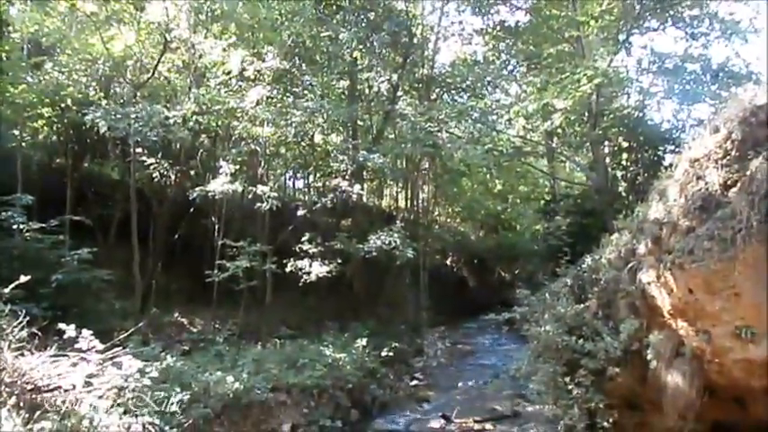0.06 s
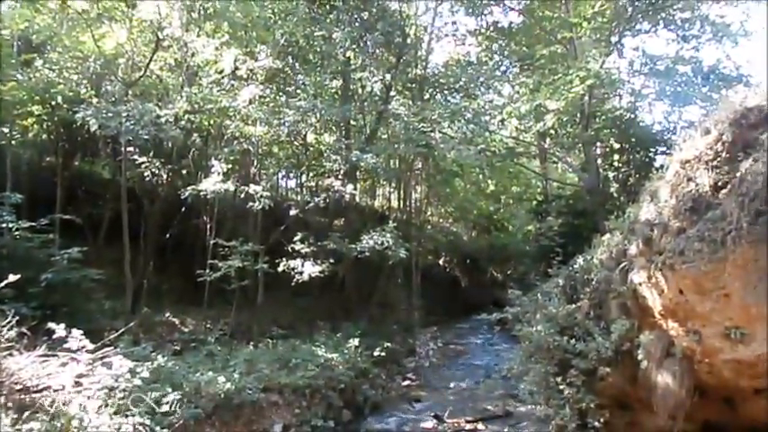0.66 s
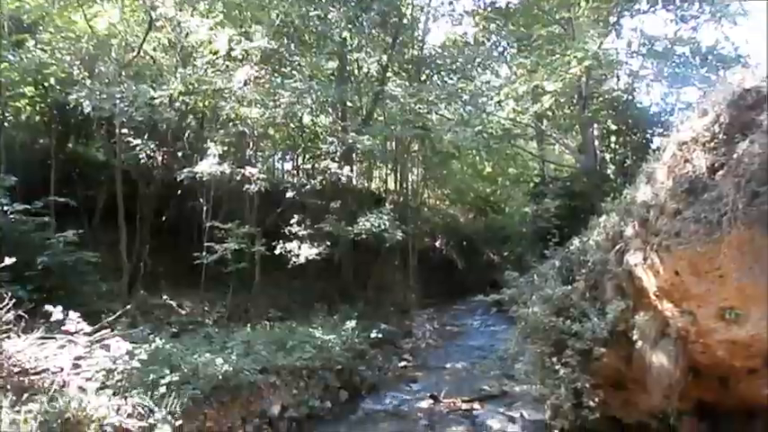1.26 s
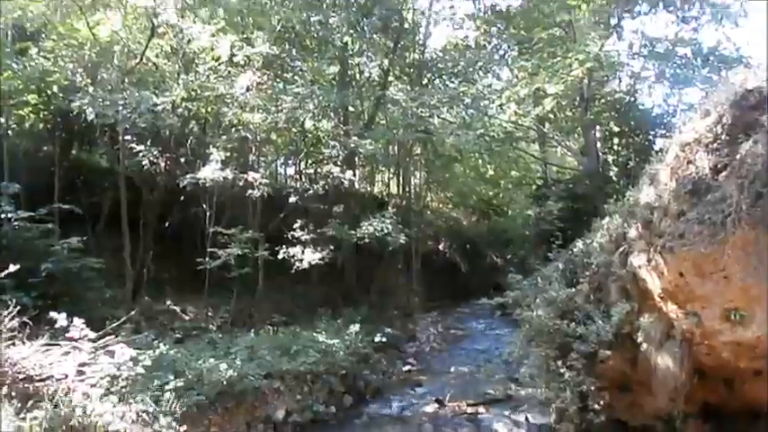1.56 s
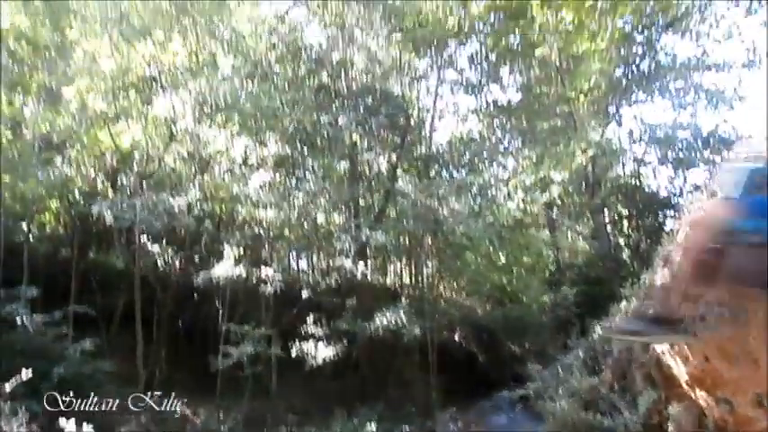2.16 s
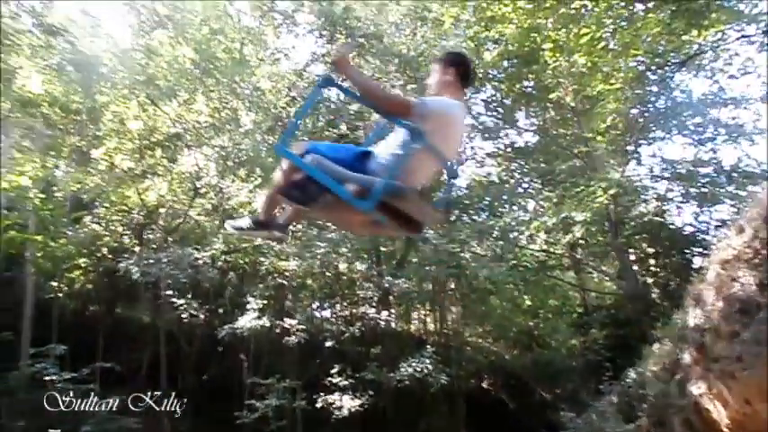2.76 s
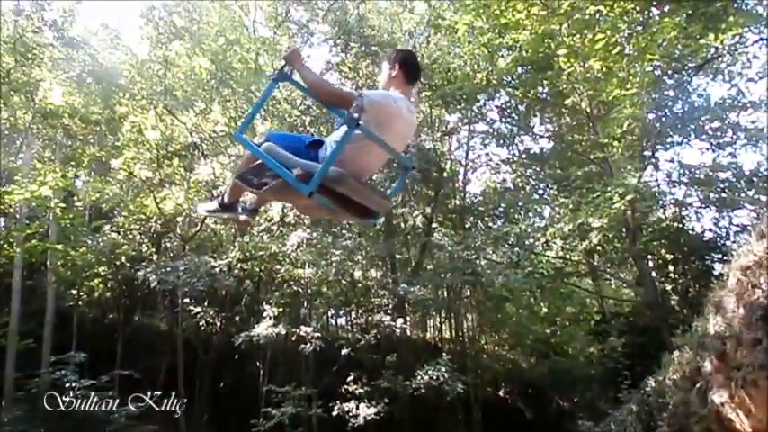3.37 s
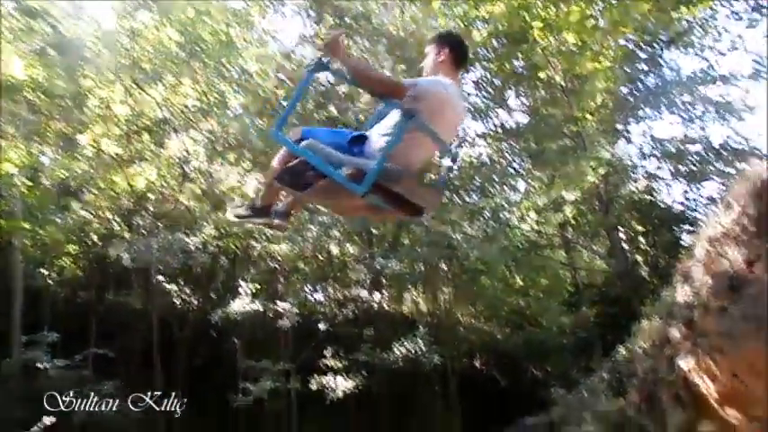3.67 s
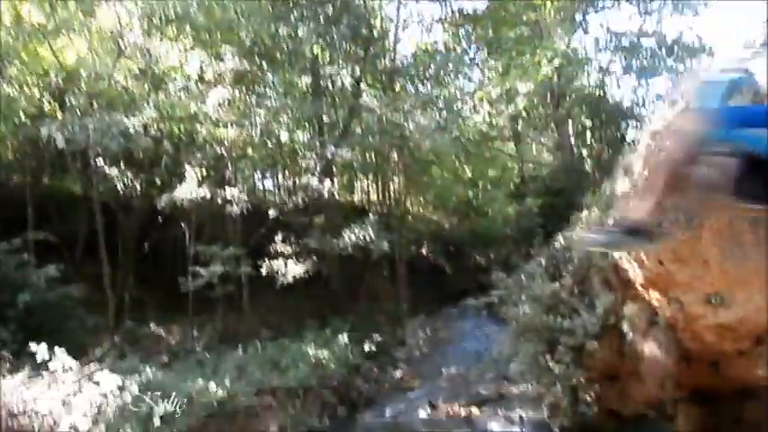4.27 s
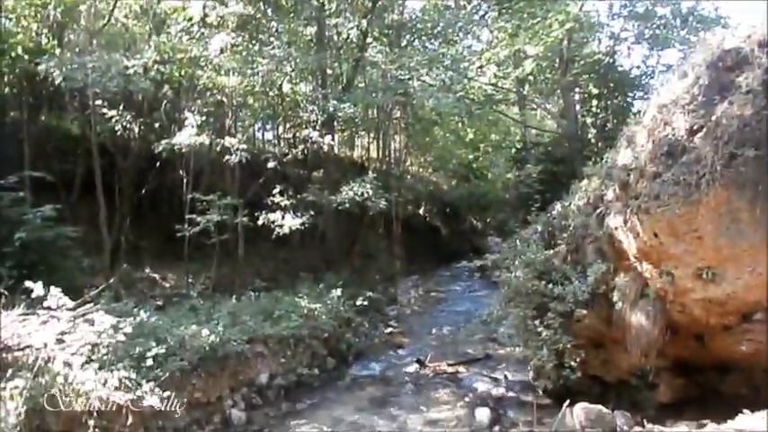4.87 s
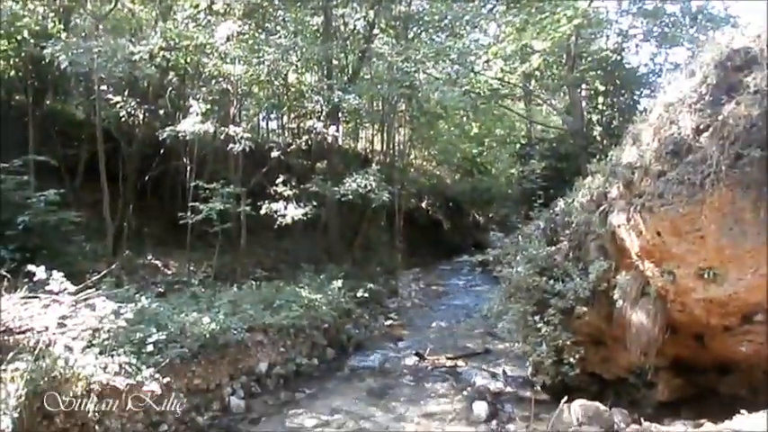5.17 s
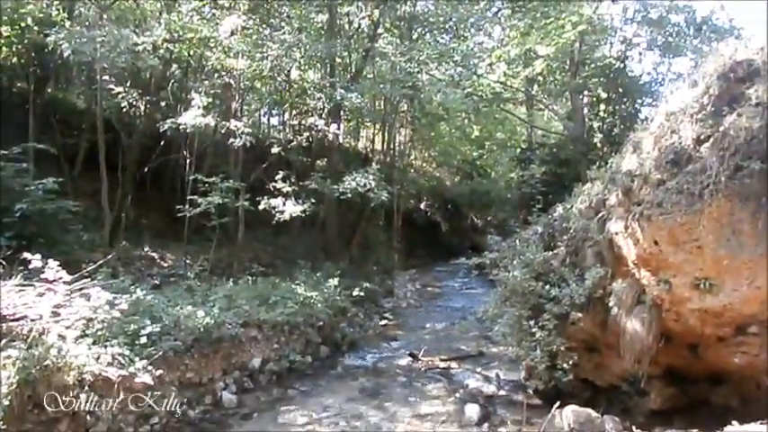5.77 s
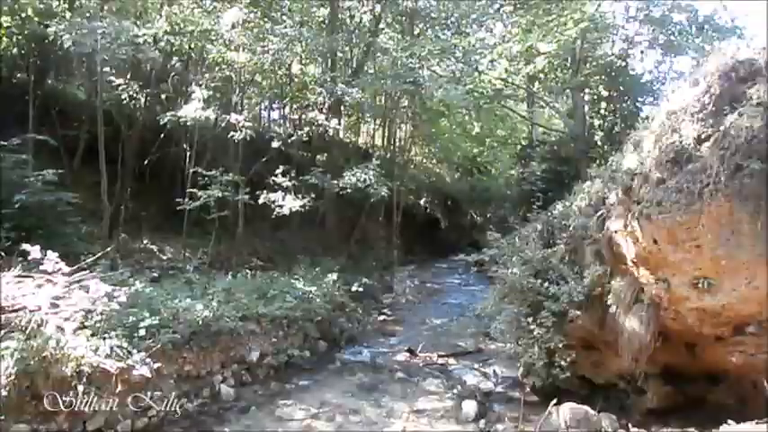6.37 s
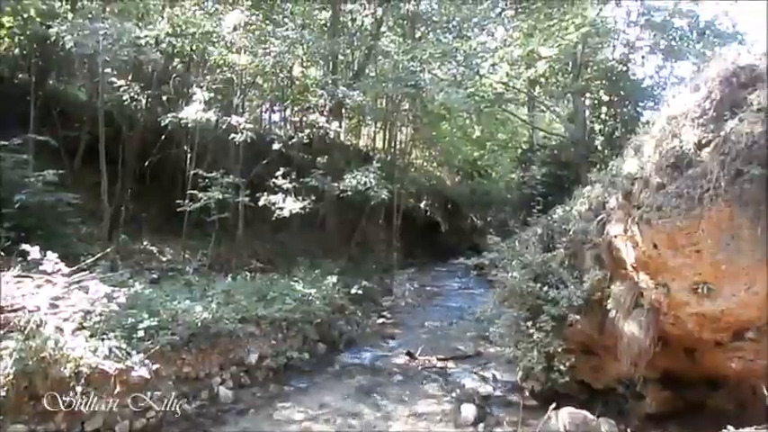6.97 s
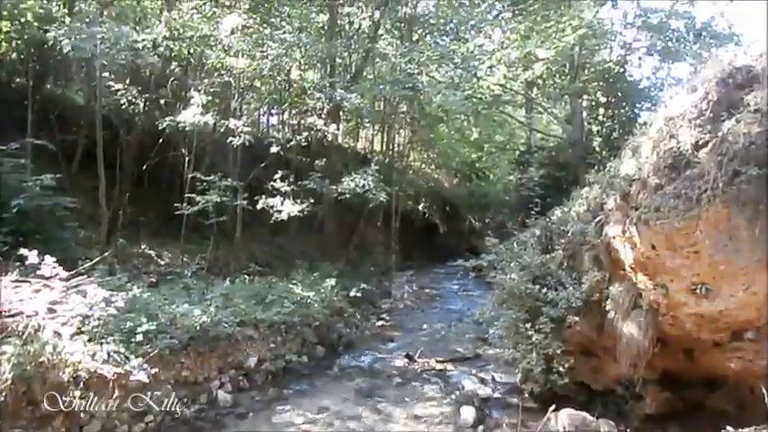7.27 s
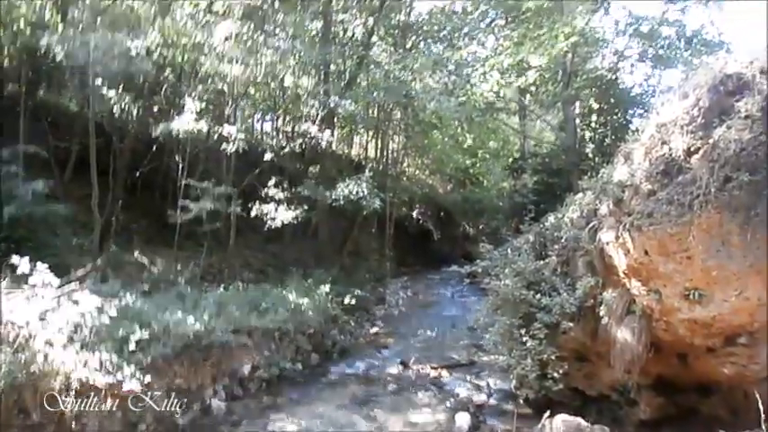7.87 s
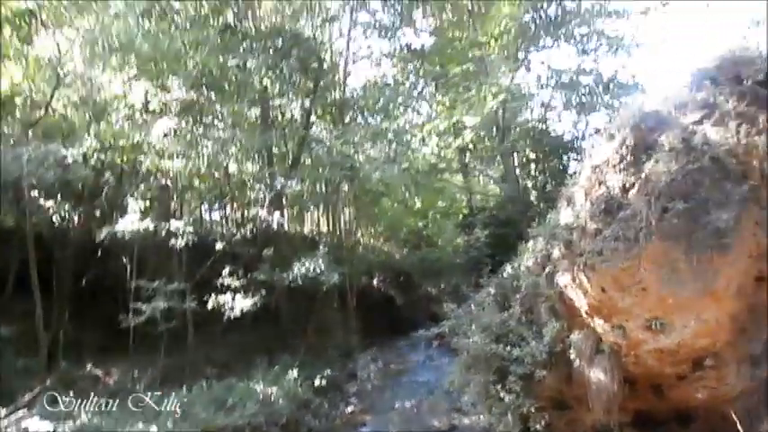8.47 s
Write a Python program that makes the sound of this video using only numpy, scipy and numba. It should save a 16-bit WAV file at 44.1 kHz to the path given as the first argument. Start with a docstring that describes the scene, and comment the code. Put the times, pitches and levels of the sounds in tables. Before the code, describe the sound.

A shallow woodland stream runs over stones from the first moment to the end, nearly nine seconds later. Countless tiny bubbles merge into an even rush, dominated by a bright, fizzy hiss, with softer gurgling lower down and very little bass. The current swells and eases only slightly, so the level stays almost constant.

A few small single bubbles plop faintly within the flow, at about 1, 1.7, 3.1, 4.7 and 5.3 seconds, then in pairs around 6.7 and 7.8 seconds, with a last one at the very end. At about 7.6 seconds there is one faint dry tick, like a twig giving way, almost buried in the water. The stream is heard from the bank through a small mono microphone that sharpens the treble and adds a barely audible, very high, thin whine throughout.

```python
"""Shallow woodland stream over stones.

Heard from the bank through a small mono camera microphone. Countless bubbles merge into an even rush;
nearer ones gurgle and fizz on top, a few plop on their own, and there is one faint dry tick.
The microphone rings near 7 kHz, turning the spray into a high hiss; the camera adds a thin whine."""
import sys
import numpy as np
from scipy import signal
from scipy.fft import rfft, irfft
from scipy.io import wavfile
from scipy.ndimage import uniform_filter1d
from numba import njit

SR = 44100
rng = np.random.default_rng(int(sys.argv[2]) if len(sys.argv) > 2 else 0)


def bounce(signal):
    """Save signal as a 16-bit WAV file at the path given by the first command-line argument."""
    frames = np.transpose(np.atleast_2d(signal))
    limited = np.clip(frames, -1, 1)
    pcm = np.round(limited * 32767).astype(np.int16)
    wavfile.write(sys.argv[1], SR, pcm)


N = 384552

# slow surges of the current over the stones: t/s, swell/dB
CURRENT_SWELL = [(0.0, 0.4), (0.52, -0.8), (0.76, 0.3), (1.16, 0.1), (1.28, -0.5), (2.04, 0.3), (2.6, -0.9),
                 (3.18, 0.5), (4.22, 0.7), (4.64, -0.7), (4.96, 0.3), (5.38, -0.9), (6.58, 0.5),
                 (7.12, -0.8), (7.3, 0.2), (8.7, 0.4)]
# spectral shape of the water, flat above the last point: f/Hz, gain/dB
WATER_SPECTRUM = [(20, -43.6), (50, -38.5), (100, -35), (250, -26.5), (400, -23.5), (520, -20), (720, -20),
                  (900, -18), (1100, -22.5), (1370, -30), (1680, -27.5), (2000, -33)]
# treble response of the microphone: f/Hz, gain/dB
MIC_RESPONSE = [(2000, 0), (2550, 6.5), (3800, 5.5), (4550, 16.2), (5050, 15), (5750, 23.5), (6400, 25),
                (7000, 27.5), (7800, 24), (9500, 8.5), (11200, -4.5), (14800, -12.5), (15600, -20.7)]
# single near bubbles: t/s, f/Hz, level/dB
NEAR_PLOPS = [(.975, 573, -21), (1.092, 643, -21), (1.688, 700, -21), (3.118, 860, -18), (4.710, 395, -24),
              (5.250, 680, -20), (6.647, 810, -21), (6.736, 810, -19), (7.677, 800, -19), (7.865, 593, -18),
              (8.655, 640, -22)]


def undb(db):
    """Decibels to gain."""
    return 10 ** (np.asarray(db) / 20)


def colour(x, points):
    """Filter by (f/Hz, gain/dB) points joined on a log-frequency axis."""
    hz, db = np.transpose(points)
    bins_hz = np.maximum(np.fft.rfftfreq(N, 1 / SR), 1)
    gain = undb(np.interp(np.log(bins_hz), np.log(hz), db))
    return irfft(rfft(x) * gain, N)


def wander(rate_hz):
    """Random steps at rate_hz, smoothed twice; unit spread."""
    hold = max(int(SR / rate_hz), 1)
    steps = np.repeat(rng.standard_normal(N // hold + 2), hold)
    smooth = uniform_filter1d(uniform_filter1d(steps, hold), hold)[:N]
    return smooth / smooth.std()


def rush(flicker_db, flicker_hz):
    """Far bubbles blur into noise; each octave flickers on its own as eddies come and go."""
    spectrum = rfft(rng.standard_normal(N))
    octave = np.log2(np.clip(np.fft.rfftfreq(N, 1 / SR), 125, 8000) / 125)
    out = np.zeros(N)
    for k in range(int(octave.max()) + 1):
        band = irfft(spectrum * np.maximum(1 - abs(octave - k), 0), N)
        out += band * undb(flicker_db * wander(flicker_hz))
    return out


@njit
def ring_bubbles(start_s, hz, gain, cycles, rise):
    """Each bubble's sine fades 50 dB over its cycles; pitch climbs by the share rise as it surfaces."""
    out = np.zeros(N)
    for b in range(len(start_s)):
        first, length = int(start_s[b] * SR), int(cycles[b] * SR / hz[b])
        phase = 0.
        for i in range(max(0, min(length, N - first))):
            age = i / length
            phase += 2 * np.pi * hz[b] * (1 + rise * age) / SR
            envelope = (1 - np.exp(-phase / 4)) * np.exp(-5.76 * age)
            out[first + i] += gain[b] * envelope * np.sin(phase)
    return out


def bubble_swarm(count, low_hz, high_hz, cycles, scatter_db, rise):
    """Random bubbles, many faint and few strong; power per Hz as in unit white noise."""
    when, pitch, strength, life = rng.random((count, 4)).T
    hz = low_hz + (high_hz - low_hz) * pitch
    level_db = -scatter_db * np.log(1 - .995 * strength)
    gain = np.sqrt(hz) * undb(level_db)  # small bubbles die sooner: stronger start, same energy
    swarm = ring_bubbles(when * N / SR, hz, gain, cycles * (.5 + life), rise)
    return swarm / swarm.std() * np.sqrt((high_hz - low_hz) / (SR / 2))


def stream():
    """Rush, gurgle and fizz swell with the current, the low churning more than the high spray."""
    gurgle = bubble_swarm(count=3600, low_hz=226, high_hz=1306, cycles=19, scatter_db=2.3, rise=.22)
    fizz = bubble_swarm(count=50000, low_hz=1304, high_hz=14000, cycles=20.4, scatter_db=1.05, rise=.087)
    water = undb(-1.28) * rush(flicker_db=.17, flicker_hz=18) + undb(-5) * gurgle + undb(-5.5) * fizz
    lows = signal.sosfiltfilt(signal.butter(2, 1400, fs=SR, output="sos"), water)
    swell_db = np.interp(np.arange(N) / SR, *np.transpose(CURRENT_SWELL))
    eddy_db = .35 * wander(rate_hz=3.88)
    churn = lows * undb(1.2 * swell_db + eddy_db)
    spray = (water - lows) * undb(swell_db)
    return colour(churn + spray, WATER_SPECTRUM)


def plops(cycles, rise):
    """Larger air pockets close under the near stones; all fade and climb alike."""
    start_s, hz, level_db = np.array(NEAR_PLOPS, float).T.copy()
    return ring_bubbles(start_s, hz, undb(level_db), np.full(len(hz), cycles), rise)


def tick(start_s, gain_db, decay_s):
    """One faint dry tick, like a twig giving way."""
    age_s = np.arange(N) / SR - start_s
    burst = rng.standard_normal(N) * (age_s >= 0) * np.exp(-abs(age_s) / decay_s)
    bandpass = signal.butter(2, [900, 2700], "bandpass", fs=SR, output="sos")
    return undb(gain_db) * signal.sosfilt(bandpass, burst)


def scene():
    """Stream, plops and tick at one microphone, the same in both channels."""
    mono = stream() + plops(cycles=21.5, rise=.2) + tick(start_s=7.592, gain_db=-16, decay_s=.003)
    return np.tile(mono, (2, 1))


def camera_whine(hz, rms_db, flutter_hz, depth):
    """Thin tone from the electronics, fluttering in level."""
    t_s = np.arange(N) / SR
    flutter = 1 + depth * np.sin(2 * np.pi * flutter_hz * t_s)
    return np.sqrt(2) * undb(rms_db) * np.sin(2 * np.pi * hz * t_s) * flutter


def record(dry):
    """The microphone lifts the treble; the electronics add whine, cut the top and leave a DC offset."""
    cutoff_hz, dc_offset = 15500, -.0065
    whine = camera_whine(hz=14947, rms_db=-54, flutter_hz=57, depth=.17)
    lowpass = signal.ellip(10, .1, 80, cutoff_hz, fs=SR, output="sos")
    return signal.sosfilt(lowpass, colour(dry, MIC_RESPONSE) + whine) + dc_offset


dry = scene()
out = record(dry)
bounce(out)
```